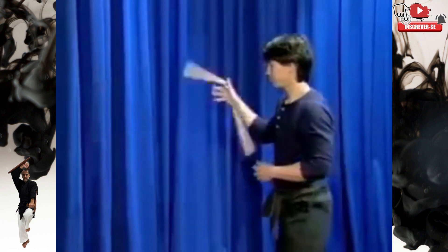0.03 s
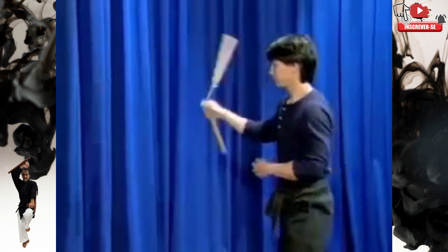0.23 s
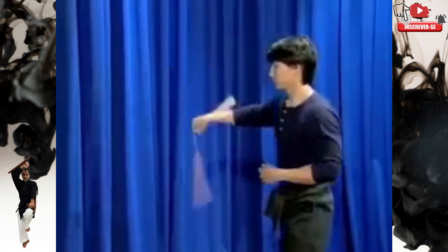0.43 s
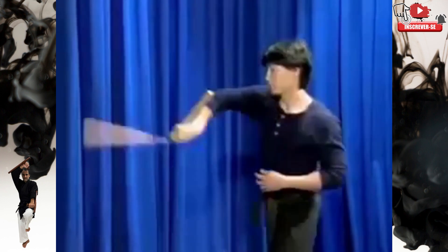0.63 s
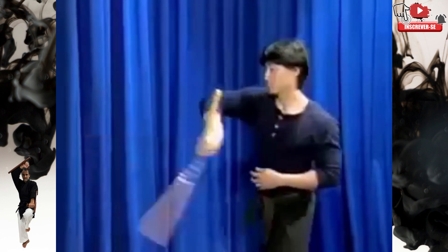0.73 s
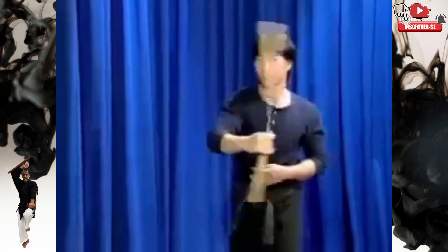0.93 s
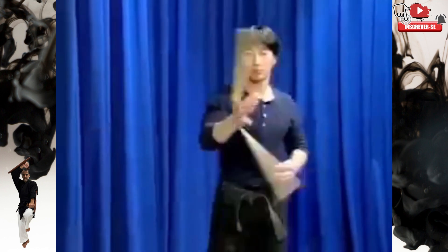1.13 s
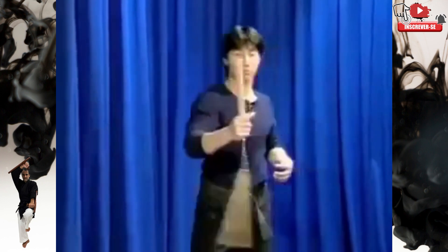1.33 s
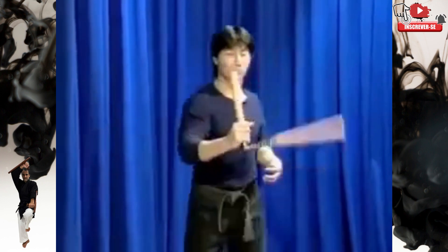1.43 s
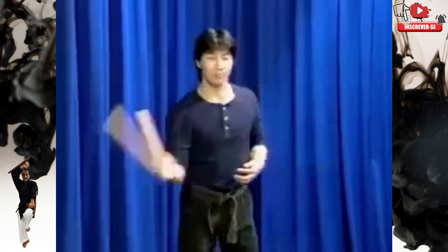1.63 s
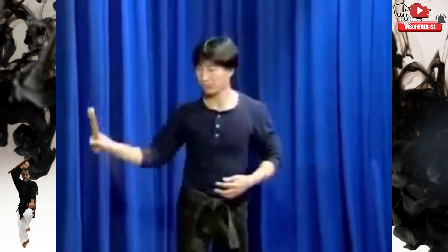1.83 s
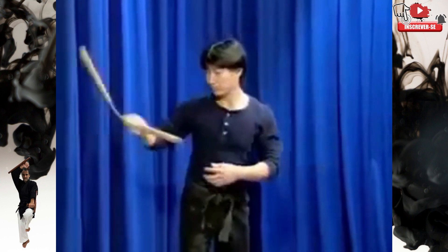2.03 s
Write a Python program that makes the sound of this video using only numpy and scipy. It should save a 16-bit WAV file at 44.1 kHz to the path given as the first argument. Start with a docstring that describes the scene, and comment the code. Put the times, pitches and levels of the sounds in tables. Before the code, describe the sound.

Chained sticks whirl and rattle in a small room. Links jingle at once; piercing metal squeaks burst out around 0.2-0.35 s, sharp clicks cluster near 0.5 s, and chirps continue to 1.2 s with faint swishes. A sparser stretch holds a short squeak at 1.4 s, then a knock and dense rattling squeaks at 1.55-1.85 s. A last faint click and swish follow near 2 s. Steady room noise and low hum; close mono, slightly overloaded peaks.

```python
"""A pair of chained sticks is whirled and caught in a room, heard in mono over steady room noise and mains hum.
Links rattle from the outset: bursts of grit and short pings as the chain goes slack and taut.
Then swivels squeak in stick-slip chirps (gliding tones, smeared when rough), sticks and sleeves swish
(coloured noise), single links click (noise burst plus ring) and sticks knock softly (damped sines).
Sparse reflections surround the sticks throughout; the loudest squeaks overload a little."""
import sys
import numpy as np
from scipy import signal
from scipy.fft import rfft, irfft
from scipy.io import wavfile

SR = 44100
rng = np.random.default_rng(int(sys.argv[2]) if len(sys.argv) > 2 else 0)


def materialize(psi):
    """Save the field psi as 16-bit PCM at rate SR to the path in sys.argv[1].

    A 1-D psi becomes a single channel; in a 2-D psi each row is a channel.
    """
    bounded = np.clip(np.atleast_2d(psi).T, -1, 1)
    quanta = np.round(bounded * 32767).astype(np.int16)
    wavfile.write(sys.argv[1], SR, quanta)


N = 92610
T = np.arange(N) / SR
T_SHORT = T[:SR // 50]
FADE_POWER = 1.054


def amp(db):
    """Decibels to gain."""
    return 10 ** (np.asarray(db) / 20)


def unit(x):
    """Scales to rms 1."""
    return x / np.sqrt(np.mean(x ** 2) + 1e-20)


def read(points, hz):
    """Reads a table on a log-frequency axis."""
    f, value = np.transpose(points)
    return np.interp(np.log(hz + 1), np.log(f), value)


def add(mix, s, sound):
    """Mixes a sound in at a time."""
    part = mix[round(s * SR):][:len(sound)]
    part += sound[:len(part)]


def lowpass_shape(f_hz, corner_hz):
    """Smooth zero-phase low-pass gain."""
    return 1 / (1 + (f_hz / corner_hz) ** 2) ** 2


def wander(corner_hz):
    """Low-passed noise of rms 1."""
    f_hz = np.fft.rfftfreq(N, 1 / SR)
    return unit(irfft(rfft(rng.standard_normal(N)) * lowpass_shape(f_hz, corner_hz), N))


def colour(x, points, size=2048):
    """Minimum-phase filter of energy 1 with the given spectral shape."""
    log_gain = np.log(amp(read(points, abs(np.fft.fftfreq(size, 1 / SR)))))
    spectrum = np.exp(np.conj(signal.hilbert(log_gain)))
    taps = np.fft.ifft(spectrum).real[:size // 2]
    return signal.oaconvolve(x, taps / np.linalg.norm(taps))[:N]


def swell(t, rise, fall):
    """Sine rise to 1, then a near-linear fade to nothing."""
    up = np.clip(t / rise, 0, 1)
    down = np.clip(1 - (t - rise) / fall, 0, 1)
    return np.sin(up * np.pi / 2) * down ** FADE_POWER


def swells(rows):
    """Joint envelope of a table of swells."""
    return sum(amp(db) * swell(T - start, rise, fall) for start, rise, fall, db in rows)


# room noise spectrum: [f/Hz, relative level/dB]
FLOOR_SPECTRUM = [(20, -11.5), (121, 1.5), (278, -6.5), (357, -1), (865, -7), (1550, -12.5), (2340, -8),
                  (2850, -18.5), (4200, -17), (6910, -27.5), (13400, -31)]
# mains hum partials: [f/Hz, rms level/dB]
HUM_PARTIALS = [(60, -44.5), (120.3, -41), (181, -50)]
FLOOR_DB = -34


def background():
    """Steady room noise and mains hum: filtered noise plus sines of random phase."""
    hum = np.zeros(N)
    for hz, db in HUM_PARTIALS:
        hum += amp(db) * np.sqrt(2) * np.sin(2 * np.pi * (hz * T + rng.random()))
    return hum + amp(FLOOR_DB) * colour(rng.standard_normal(N), FLOOR_SPECTRUM, size=8192)


LINK_SPREAD_DB = 3  # mean of the exponential spread, capped at three times this


def contacts(per_s):
    """Random link contacts of uneven strength."""
    hits = rng.random(N) < per_s / SR
    return hits * amp(LINK_SPREAD_DB * np.minimum(rng.exponential(1, N), 3))


PINGS_PER_S, PING_RING_S = 900, 0.003  # rate over all pitches, amplitude decay to 1/e


def pings(count=48):
    """Random contacts excite short decaying sines at a spread of fixed pitches."""
    out = np.zeros(N)
    for hz in np.linspace(1800, 14500, count) * rng.uniform(.97, 1.03, count):
        ring = np.exp(-T_SHORT / PING_RING_S) * np.sin(2 * np.pi * hz * T_SHORT)
        out += signal.oaconvolve(contacts(PINGS_PER_S / count), ring)[:N]
    return unit(out)


# spectrum of a link's contact: [f/Hz, relative level/dB]
LINK_SPECTRUM = [(100, -61), (900, 0.5), (1500, -13), (2000, -3), (2500, 3.5), (3200, -4), (4200, 3),
                 (5500, -1.5), (6800, -6.5), (8500, -8.5), (11000, -18.5), (15000, -20)]
# runs of tumbling links: [start t/s, rise t/s, fall t/s, level/dB]
RATTLE_SWELLS = [(0, 0.00072, 0.13, -27.5), (.228, 0.001, 0.09, -19.5), (.412, 0.014, 0.046, -21.5),
                 (.478, 0.017, 0.1, -23), (.542, 0.016, 0.022, -18), (.595, 0.016, 0.33, -28.5),
                 (.722, 0.0043, 0.064, -28.5), (1.16, 0.0037, 0.089, -26), (1.49, 0.0015, 0.034, -25),
                 (1.615, 0.0011, 0.011, -18.5), (1.63, 0.013, 0.085, -24), (1.700, 0.04, 0.018, -16),
                 (1.745, 0.049, 0.04, -17.5)]
LINKS_PER_S, LINK_RING_S = 900, .0012
PING_SHARE = .6  # of power


def rattles():
    """Links tumble over each other: random contacts as decaying grit and pings."""
    energy = signal.oaconvolve(contacts(LINKS_PER_S) ** 2, np.exp(-2 * T_SHORT / LINK_RING_S))[:N]
    grit = unit(np.sqrt(abs(energy)) * rng.standard_normal(N))
    texture = np.sqrt(1 - PING_SHARE) * grit + np.sqrt(PING_SHARE) * pings()
    return colour(texture * swells(RATTLE_SWELLS), LINK_SPECTRUM)


# reverberation time for a 60 dB fall: [f/Hz, t/s]
REVERB_T60 = [(200, 0.16), (4500, 0.32), (9000, 0.25), (15000, 0.16)]
ROOM_DELAY_S, REFLECTIONS_PER_S = .004, 3000


def room(x, size=256):
    """Sparse reflections of random sign, each band dying at its own rate, the top treble fast."""
    taps = rng.choice([-1., 1.], SR) * (rng.random(SR) < REFLECTIONS_PER_S / SR)
    taps = taps * (T[:SR] > ROOM_DELAY_S)
    hz, t, z = signal.stft(taps, SR, nperseg=size)
    decay = amp(-60 * t / read(REVERB_T60, hz)[:, None])
    tail = signal.istft(z * decay, SR, nperseg=size)[1]
    return signal.fftconvolve(x, tail / np.linalg.norm(tail))[:N]


# swivel squeaks: [start t/s, rise t/s, fall t/s, level/dB, first f/Hz, last f/Hz, roughness/1]
SQUEAK_CHIRPS = [ (0.089, 0.00043, 0.049, -16, 2410, 2810, 0.4),
                 (0.132, 0.0011, 0.011, -12.5, 2154, 2800, 0.19),
                 (0.2245, 0.0033, 0.0016, -0.5, 4290, 3340, 0.37),
                 (0.2292, 0.00064, 0.017, 6, 2635, 2458, 0.36),
                 (.257, 0.011, 0.0036, -5.5, 2620, 2745, 0.4), (0.272, 0.0058, 0.029, -11, 2440, 2696, 1),
                 (.292, 0.014, 0.018, -15, 3000, 3260, 1.01), (0.307, 0.014, 0.0042, -2, 4450, 4714, 0.03),
                 (0.3237, 0.0027, 0.012, 4, 4757, 4890, 0.14), (0.334, 0.004, 0.056, -22, 6900, 6050, 0.66),
                 (0.366, 0.033, 0.015, -17.5, 4710, 4000, 0.43),
                 (0.405, 0.0016, .005, -10, 3880, 3800, 0.4), (.411, .003, 0.0052, -10.5, 5150, 4800, 0),
                 (0.594, 0.0078, 0.075, -15, 4650, 5030, 0.53),
                 (0.666, 0.0028, 0.0048, -6.5, 5330, 5700, 0.18),
                 (0.683, 0.0016, 0.024, -12.5, 5330, 5970, 0.25),
                 (.7235, 0.0048, 0.0062, -3, 3755, 3070, 0.08), (0.732, 0.0025, 0.018, -7, 3660, 3814, 0.5),
                 (.869, 0.0028, 0.0064, -6.5, 4590, 4600, 0.04),
                 (.879, 0.0038, 0.051, -10.5, 4670, 4387, 0.4),
                 (0.9144, 0.0014, 0.0077, -5, 4420, 4400, 0.56),
                 (0.924, 0.032, 0.013, -10.5, 4500, 5070, 0.72),
                 (.957, 0.0044, 0.046, -13, 6510, 6290, 0.47),
                 (0.959, 0.0042, 0.042, -17, 4950, 4380, 0.34),
                 (1.005, .003, 0.038, -16.5, 4320, 4210, 0.42),
                 (1.030, 0.026, 0.036, -24, 6460, 6520, 0.44),
                 (1.092, 0.0043, 0.0063, -18, 3600, 3530, 0.42),
                 (1.10, 0.02, 0.0355, -25.5, 5710, 5100, 0.6),
                 (1.16, 0.012, 0.0386, -17.5, 2860, 2330, 0.5),
                 (1.167, 0.002, 0.023, -6.5, 4318, 4050, 0.25),
                 (1.183, 0.0036, 0.026, -13, 4280, 3650, 0.32),
                 (1.195, 0.024, 0.036, -19.5, 2268, 2370, 0.37),
                 (1.385, 0.032, 0.049, -24.5, 2428, 2390, 0.08), (1.418, 0.013, 0.0051, -7, 2432, 2407, 0),
                 (1.497, 0.022, 0.045, -28, 4990, 4800, 0.25),
                 (1.572, 0.0023, 0.0039, -9.5, 4020, 4240, 0.25),
                 (1.58, 0.0016, 0.0069, -11, 4250, 4120, 0.78),
                 (1.704, 0.022, 0.019, -6.5, 4950, 4615, 1.23),
                 (1.721, 0.0052, 0.013, -7, 2650, 2880, 0.56), (1.75, 0.031, 0.014, -8, 4825, 4405, 0.96),
                 (1.754, 0.044, 0.0084, -13, 2780, 2436, 0.71), (1.787, 0.0084, 0.033, 0, 4550, 4420, 0.47),
                 (1.824, 0.068, 0.074, -24.5, 4480, 4420, 0.4)]
# smooth-slip harmonics, fundamental first: [level/dB]
SQUEAK_PARTIALS_DB = [-3, -34, -43.5]
OVERTONE_ROUGH_DB = 20.5  # overtone boost per unit roughness
WOBBLE_SHARE, WOBBLE_HZ = 0.0507, 163  # rms pitch share per unit roughness, corner
SCRAPE_SHARE, SCRAPE_HZ, OVERTONE_SMEAR = 0.89, 1080, 2.2  # smear, bandwidth at roughness 1, growth


def squeaks():
    """Steel slips on steel: a near-pure gliding tone that wobbles and smears when the grip is uneven."""
    out, wobble = np.zeros(N), wander(WOBBLE_HZ)
    grain = rng.standard_normal(N) + 1j * rng.standard_normal(N)
    for start, rise, fall, db, first_hz, last_hz, rough in SQUEAK_CHIRPS:
        span = (T >= start) & (T < start + rise + fall)
        t = T[span] - start
        hz = np.linspace(first_hz, last_hz, len(t)) * (1 + WOBBLE_SHARE * rough * wobble[span])
        phase = 2 * np.pi * np.cumsum(hz) / SR
        level = amp(db) * swell(t, rise, fall)
        # complex noise modulates the tone into a band
        width_hz = SCRAPE_HZ * np.sqrt(rough) + 1
        band = lowpass_shape(np.fft.fftfreq(len(t), 1 / SR), width_hz)
        scrape = np.fft.ifft(np.fft.fft(grain[span]) * band)
        scrape /= np.sqrt(np.mean(abs(scrape) ** 2))
        for k, partial_db in enumerate(SQUEAK_PARTIALS_DB):
            smear = SCRAPE_SHARE * rough * (1 + k * OVERTONE_SMEAR)
            smeared = (1 + smear * scrape) * np.exp(1j * (k + 1) * phase)
            partial = smeared.imag / np.hypot(1, smear)
            boost_db = (k > 0) * rough * OVERTONE_ROUGH_DB
            out[span] += level * amp(partial_db + boost_db) * partial
    return out


# swishes of stick and sleeve: [start t/s, rise t/s, fall t/s, level/dB]
SWISH_SWELLS = [(.16, 0.012, 0.17, -31.5), (.26, 0.026, 0.042, -31.5), (.60, 0.046, 0.026, -29),
                (.72, 0.035, 0.014, -24), (.82, 0.033, 0.14, -33), (1.17, 0.027, 0.1, -30.5),
                (1.36, 0.012, 1, -36), (1.55, 0.13, 0.038, -33), (1.98, 0.053, 0.074, -28.5)]
# swish spectrum: [f/Hz, relative level/dB]
SWISH_SPECTRUM = [(60, -16), (250, -2), (550, -1), (900, 4.5), (1300, -10.5), (2200, -4), (3500, -13),
                  (10000, -24)]


def swishes():
    """Air and cloth rush with each swing: coloured noise in swells."""
    return colour(rng.standard_normal(N), SWISH_SPECTRUM) * swells(SWISH_SWELLS)


# single link clicks: [t/s, level/dB, ring f/Hz]
LINK_CLICKS = [(.2012, -13, 4000), (0.4416, -23, 3580), (0.4734, 3, 3900), (0.4779, -5.5, 6060),
               (.4892, -7, 5840), (.5437, -12, 4530), (0.5453, -6.5, 2760), (0.5486, -2.5, 4800),
               (.6145, -8.5, 6000), (0.6477, -14, 2640), (.731, -12, 1810), (0.8393, -4.5, 5520),
               (.9146, -12, 3900), (1.4902, -24, 5000), (1.6168, -10.5, 8600), (1.6442, -7, 2220),
               (1.721, -2, 4410), (1.7675, -9, 2530), (2.034, -17, 2510)]
CLICK_DECAY_S, CLICK_RING_S = 0.00097, 0.0015
CLICK_RING_SHARE = 0.38


def clicks():
    """Links collide hard: a decaying noise burst plus a ring at the click's own pitch."""
    bursts, rings = np.zeros(N), np.zeros(N)
    decay = np.exp(-T_SHORT / CLICK_DECAY_S)
    burst_rms = np.sqrt((1 - CLICK_RING_SHARE) * np.mean(decay ** 2))
    ring_decay = np.sqrt(2 * CLICK_RING_SHARE) * np.exp(-T_SHORT / CLICK_RING_S)
    for s, db, hz in LINK_CLICKS:
        burst = unit(rng.standard_normal(len(T_SHORT)) * decay)
        add(bursts, s, amp(db) * burst_rms * burst)
        add(rings, s, amp(db) * ring_decay * np.sin(2 * np.pi * hz * T_SHORT))
    return colour(bursts, LINK_SPECTRUM) + rings


# sticks knock in the hand: [t/s, level/dB, f/Hz, decay t/s]
STICK_KNOCKS = [(.282, -20.5, 707, .012), (0.737, -18.5, 944, 0.021), (1.5523, -4, 520, 0.0008),
                (1.636, -17, 775, 0.013)]


def knocks():
    """Dull, heavily damped blows: decaying sines."""
    out = np.zeros(N)
    for s, db, hz, decay_s in STICK_KNOCKS:
        t = np.maximum(T - s, 0)
        out -= amp(db) * np.exp(-t / decay_s) * np.sin(2 * np.pi * hz * t)
    return out


ROOM_DB = -9.5


def scene():
    """The whirling sticks in the room, the same in both channels."""
    sticks = rattles() + squeaks() + swishes() + clicks() + knocks()
    mono = background() + sticks + amp(ROOM_DB) * room(sticks)
    return np.array([mono, mono])


CEILING, KNEE, CUTOFF_HZ = .92, 6, 15100  # full scale = 1; higher knee = harder


def record(dry):
    """Soft overload at twice the sample rate, then the band limit."""
    fine = signal.resample_poly(dry, 2, 1, axis=1)
    squashed = fine / (1 + abs(fine / CEILING) ** KNEE) ** (1 / KNEE)
    coarse = signal.resample_poly(squashed, 1, 2, axis=1)
    lowpass = signal.firwin(255, CUTOFF_HZ, window=("kaiser", 8), fs=SR)
    return signal.oaconvolve(coarse, lowpass[None], "same")


dry = scene()
out = record(dry)
materialize(out)
```